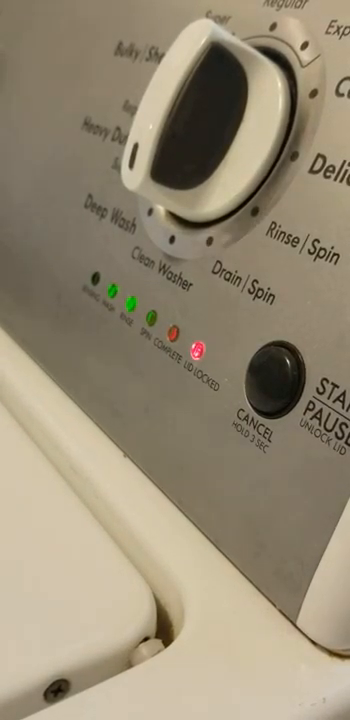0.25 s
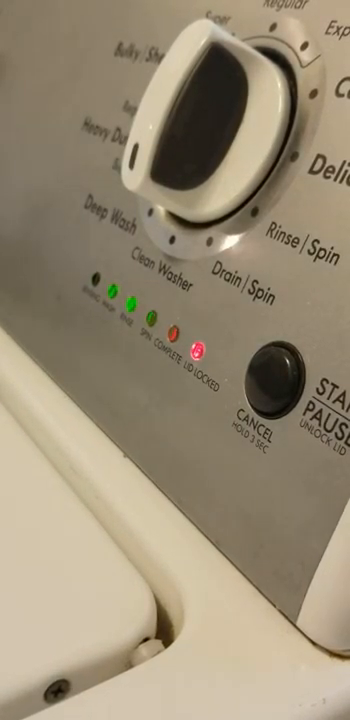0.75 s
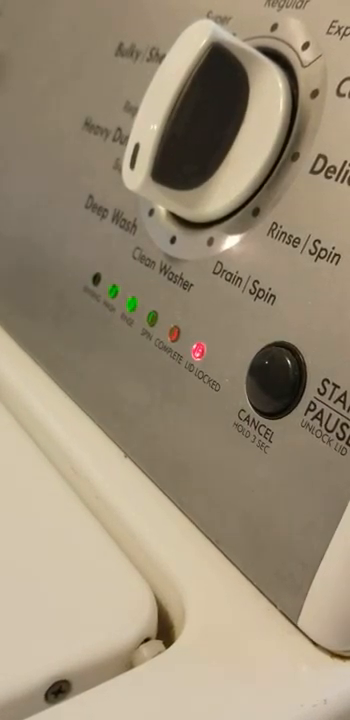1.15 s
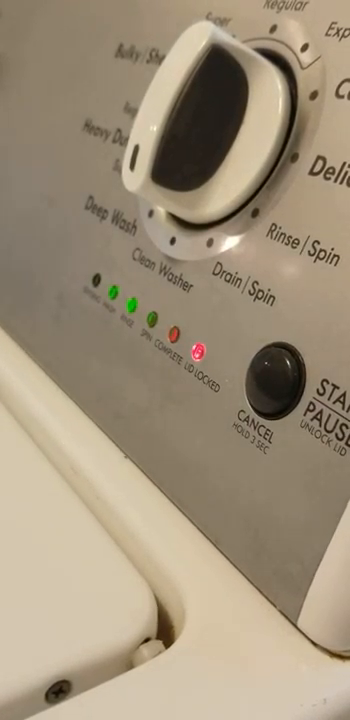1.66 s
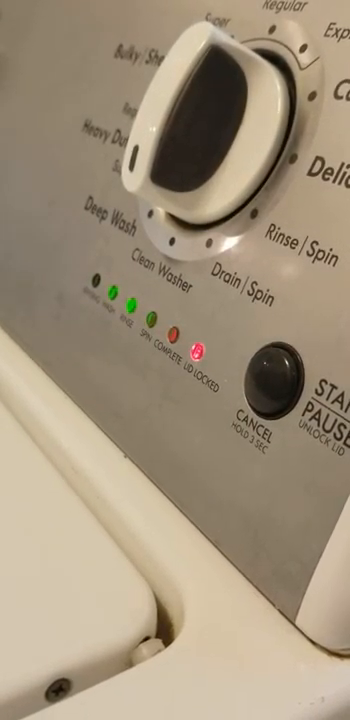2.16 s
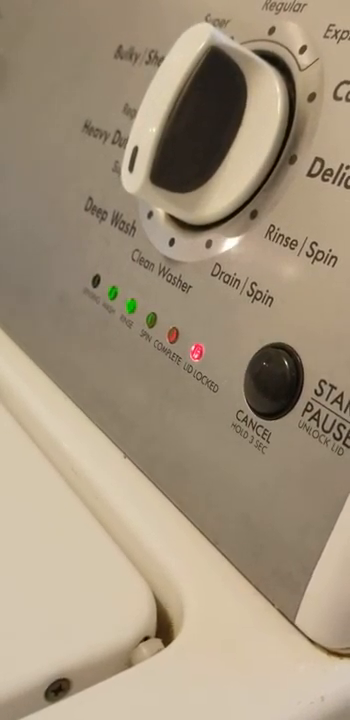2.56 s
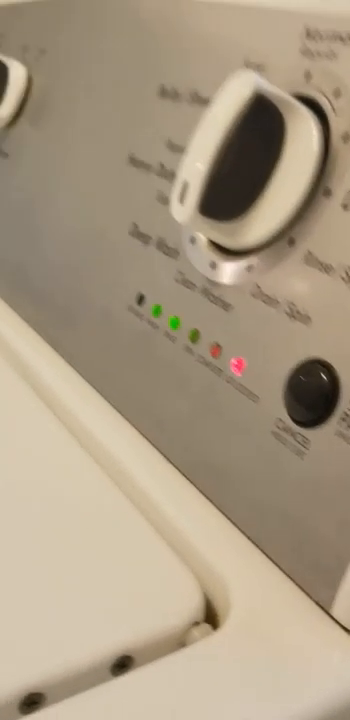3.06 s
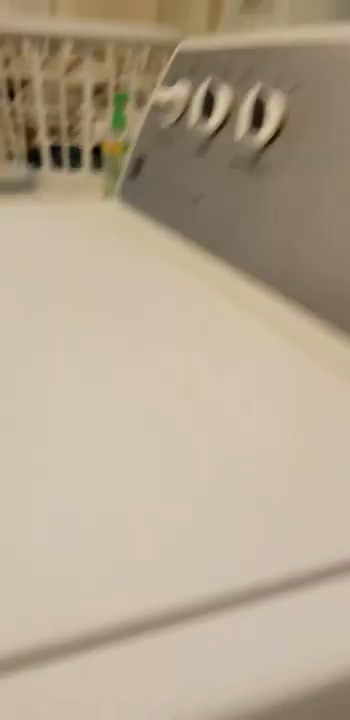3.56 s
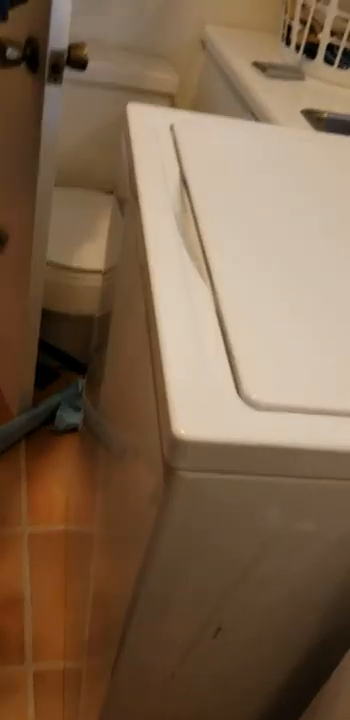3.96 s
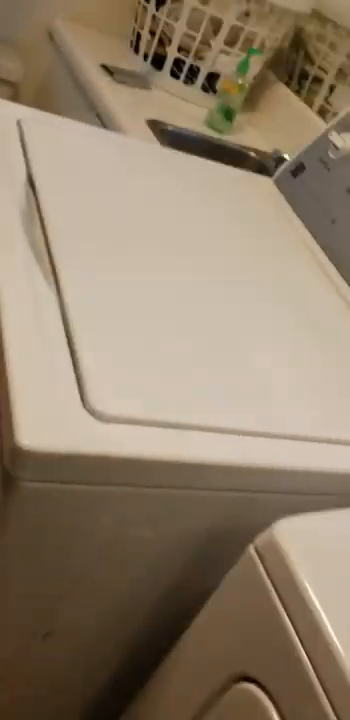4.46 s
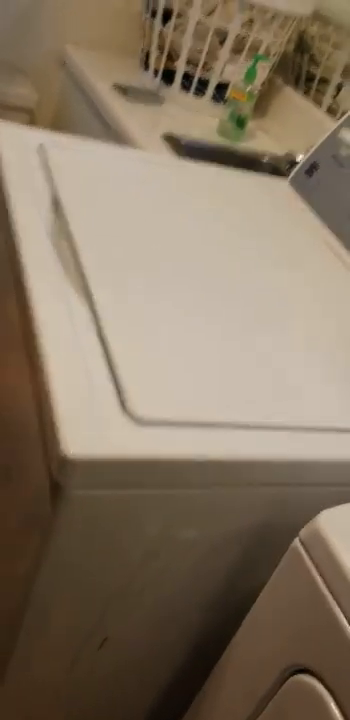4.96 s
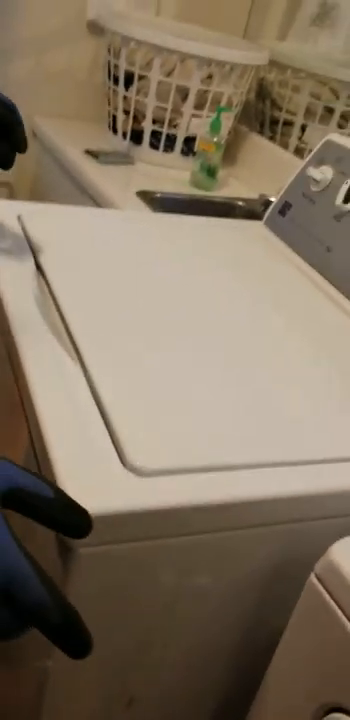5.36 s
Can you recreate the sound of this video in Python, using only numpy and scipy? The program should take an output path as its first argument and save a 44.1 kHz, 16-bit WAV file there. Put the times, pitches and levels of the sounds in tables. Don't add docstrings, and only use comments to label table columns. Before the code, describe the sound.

A top-loading washing machine fills behind its closed lid in a small laundry room. A bright jet of water hisses, sputters and splashes continuously, while falling water drums on the basket with a low, hollow, uneven boom. Wet slaps, plops and dull knocks scatter through it, a sharper one around 3.5 seconds. Close handheld stereo microphone, one side duller; the low boom weakens as it moves away.

```python
import sys
import numpy as np
from scipy import signal
from scipy.fft import rfft, irfft, next_fast_len
from scipy.io import wavfile

SR = 44100
rng = np.random.default_rng(int(sys.argv[2]) if len(sys.argv) > 2 else 0)


def invert_db(x):
    u = np.asarray(x, float) / 20
    return 10 ** u


def unload_wav(signal):
    wavfile.write(
        sys.argv[1],
        SR,
        np.round(np.clip(np.atleast_2d(signal).T, -1, 1) * 32767).astype(np.int16),
    )


N = 247842
STEP = 16

# time_s, jet_flow_db, nearness_db
FILL = [(0, -41, -16), (.25, -35, 4.5), (.45, -37.5, 2), (.7, -37, -2.5), (1.0, -36.5, 4.5),
        (1.5, -36, 4.5), (2.05, -36.5, -1.5), (2.55, -35, -7.5), (3.0, -35.5, -5), (3.5, -37, -8),
        (3.8, -35.5, -8), (4.0, -36, -7.5), (4.3, -37.5, -15), (4.7, -35.5, -8), (4.92, -37, 1),
        (5.2, -38.5, -8), (5.62, -39.5, -16)]
# time_s, level_db
SPRAY_BODY = [(0, 0), (.25, 0), (1, 0), (1.5, -0.1), (2.05, 1.5), (2.3, -1.5), (2.55, -1), (3, 0), (3.5, 1),
              (3.8, -1), (4, -1), (4.3, 2.5), (4.7, -0.5), (4.92, -0.5), (5.2, 1.4), (5.45, 1.5), (5.62, 5.5)]
# time_s, level_db
FALTERS = [(0.057, -3), (0.659, -7), (1.29, -27), (1.467, -15), (1.711, -4), (2.088, -10), (2.252, -11),
           (2.492, -1.5), (2.553, 0.5), (2.873, -1), (3.45, -9), (3.841, -16), (3.91, -3.5), (4.188, -25),
           (4.378, -3), (4.5, -1.5), (4.597, -9), (4.647, -5), (4.729, -13), (4.949, -1.5), (5.006, -7),
           (5.308, -2), (5.408, -3), (5.488, -10), (5.605, -14)]
# crest_s, level_over_lull_db
SURGES = [(0, 9), (.27, 9.5), (.59, 11), (.78, 5), (.86, 6), (1.03, 6.5), (1.22, 4.5), (1.33, 8),
          (1.47, 14.5), (1.57, 6.5), (1.64, 3.5), (1.785, 8), (1.94, 7.5), (2.1, 7), (2.21, 4.5), (2.36, 9),
          (2.5, 3.5), (2.68, 4), (2.74, 5), (2.85, 7), (2.95, 11.5), (3.1, 5), (3.38, 9), (3.58, 9),
          (3.72, 10), (3.79, 8.5), (3.86, 4.5), (4.14, 11), (4.3, 10), (4.41, 8), (4.55, 11), (4.74, 9),
          (4.9, -1), (5.43, 3.5), (5.6, 10.5)]
# time_s, level_db
THROBS = [(0.048, 10), (0.106, 12), (0.137, 11), (0.261, 4), (0.408, 6), (0.535, 7), (0.612, 9.5),
          (0.771, 3), (0.801, 11.5), (0.841, 8), (1.015, 6), (1.047, 10), (1.099, 9.5), (1.242, 6),
          (1.328, 6.5), (1.441, 7), (1.567, -1), (1.792, 9.5), (1.908, 9), (2.078, 4.5), (2.21, 6),
          (2.359, 0.5), (2.504, 7), (2.68, 7), (2.726, 3), (2.942, 5), (2.978, 2), (3.061, 7), (3.142, 10),
          (3.227, 6), (3.272, 5), (3.379, 3.5), (3.575, 3.5), (3.658, 6.5), (3.766, 4), (3.87, 9),
          (4.017, 7), (4.097, 10), (4.151, 3), (4.307, 2), (4.423, 0), (4.548, 8), (4.754, 2), (4.843, 9),
          (4.93, 10.5), (5.111, 2), (5.197, 4), (5.297, -7), (5.346, 3), (5.43, 8.5), (5.482, 8),
          (5.576, 9)]
# time_s, level_db
BREAKS = [(0.074, -13), (0.324, -5), (0.478, -8), (0.67, 0), (0.717, -2), (0.904, -18), (1.077, -9),
          (1.172, -25), (1.607, -16), (1.836, -6), (1.87, -9), (2.17, -11), (2.259, -15), (2.405, -18),
          (2.602, -11), (2.64, -10), (2.773, -18), (2.888, -6), (3.036, -9), (3.249, -11), (3.34, -11),
          (3.522, -14), (3.622, -10), (3.847, -10), (4.075, -9), (4.19, -14), (4.27, -11), (4.49, -15),
          (4.594, -14), (4.734, -13), (4.79, -17), (5.22, -24), (5.394, -18), (5.534, -17)]
# start_s, peak_db
THUMPS = [(0.002, -22), (2.735, -19), (3.798, -19), (4.012, -20.5), (5.468, -21.5), (0.826, -24),
          (0.884, -28), (0.939, -20), (1.008, -25), (1.086, -24), (1.205, -25), (1.474, -30), (1.778, -25),
          (2.608, -19.5), (2.713, -26), (2.975, -21.5), (3.136, -20.5), (3.259, -21), (3.406, -22),
          (3.5, -24), (3.671, -24.5), (3.744, -21), (3.859, -24), (4.607, -23), (4.739, -20.5),
          (4.823, -20.5), (5.417, -21.5), (.66, -26.5), (.752, -22.5), (.972, -31), (1.252, -31),
          (1.392, -28), (1.572, -26), (1.612, -36), (1.742, -25), (2.212, -24), (2.372, -22.5),
          (2.422, -21.5), (2.502, -29), (2.832, -22), (2.932, -28), (3.002, -21.5), (3.092, -27),
          (3.212, -25), (3.292, -24), (4.112, -25), (4.202, -25.5), (4.242, -20), (4.552, -21),
          (4.862, -24.5), (4.942, -21), (5.052, -24), (5.342, -27), (5.562, -28)]
# pitch_hz, width_hz, level_over_bed_db, left_right_likeness (0 to 1), right_minus_left_db
BASKET_MODES = [(139.1, 4.7, 3.5, 1, 0), (220.9, 16.1, 15.5, 0.98, 0), (266, 42, 9, 0.89, -1),
                (330.5, 18.8, 9.5, 1, -0.5), (436.6, 11, 1.5, 1, 4), (511, 30.4, 12.5, 0.13, -6),
                (532.7, 21, 5.5, 0.69, 10), (582.7, 22.7, 13, 0.98, -4), (617.5, 31.6, 11, 0.24, 13.5),
                (646, 36, 4, 0.48, 9.5), (725, 46, 7, 0.14, -3.5), (817, 32.4, 5.5, 0.27, 7),
                (1036, 73, 3.5, 0.076, 9.5), (1204, 18.6, 8.5, 0.12, 5.5)]
# pitch_hz, width_hz, left_gain_db, right_gain_db
PANEL_MODES = [
    (1841, 19, 7, 10.5),
    (2110, 88, 4.5, 10),
    (2657, 28, 6, 15),
    (2717, 37, 7, -4),
    (3780, 120, 4.5, 4),
    (4025, 53, 5, 12),
    (4840, 37, -5, -25),
    (5080, 76, 4, 9),
]
# start_s, peak_db, centre_hz, t60_s, spread_octaves
DEEP_SLAPS = [(.6679, -24, 2116, 0.28, 0.12), (0.96, -18.5, 2960, 0.17, 0.33),
              (1.153, -19.5, 2600, 0.16, 0.41), (1.41, -19.5, 2805, 0.2, 0.39),
              (1.6, -18, 2110, 0.18, 0.15), (2.38, -13, 3030, 0.22, 0.28), (2.7754, -20, 2670, 0.17, 0.77),
              (3.004, -17, 2720, 0.096, 0.18), (3.374, -9.5, 2585, 0.15, 0.14),
              (3.546, -13.5, 2490, 0.17, 0.52), (3.628, -17, 2710, 0.3, 0.29),
              (3.745, -18, 2850, 0.1, 0.37), (4.243, -19.5, 2730, .14, 0.14),
              (4.514, -22.5, 1990, 0.16, 0.97), (4.7632, -23.5, 2610, 0.18, .45),
              (5.108, -24, 4630, 0.11, 0.45), (5.169, -15.5, 1120, 0.06, 0.55),
              (5.4213, -22, 2110, 0.093, 0.97)]
# start_s, peak_db, centre_hz, t60_s
WALL_SLAPS = [(.2271, -22, 3920, 0.13), (.2588, -19, 4400, 0.11), (0.769, -20, 4200, 0.087),
              (.834, -23, 3360, 0.14), (1.194, -23.5, 4140, 0.25), (1.306, -13, 4080, 0.095),
              (1.5505, -21.5, 4320, 0.32), (1.602, -14.5, 4200, 0.084), (1.8093, -23.5, 3670, 0.35),
              (2.0237, -22, 3780, 0.13), (2.1909, -22, 4120, 0.15), (2.2092, -14.5, 4000, 0.12),
              (2.8868, -16, 4100, 0.24), (2.983, -18, 3780, 0.17), (3.0933, -19.5, 4060, 0.43),
              (3.2161, -18.5, 4120, 0.14), (3.5478, -17, 3700, 0.047), (3.747, -21.5, 3650, 0.3),
              (3.8636, -24, 4250, 0.11), (3.9985, -24, 3780, 0.24), (4.155, -21, 3280, 0.1),
              (4.2407, -20, 3690, 0.21), (4.4073, -18, 4090, 0.14), (4.6134, -20.5, 4160, 0.18),
              (5.0613, -22.5, 3890, 0.19), (5.161, -23, 4100, 0.097), (5.205, -19, 4250, 0.074),
              (5.5067, -24, 3740, 0.096), (5.5276, -15, 3980, 0.12), (5.555, -18.5, 3780, 0.13)]
# start_s, peak_db, centre_hz, t60_s
SPLASHES = [(.398, -25.5, 6660, 0.15), (.4409, -25.5, 6000, 0.27), (.9178, -26, 5560, .13),
            (0.938, -23, 5730, .36), (1.0056, -23.5, 6040, 0.1), (1.055, -20, 5170, 0.14),
            (1.178, -23, 5100, .1), (1.7704, -20, 5150, 0.081), (1.95, -24.5, 8450, 0.23),
            (2.509, -24.5, 5130, 0.085), (2.5681, -25.5, 5100, 0.18), (2.62, -24.5, 5520, 0.25),
            (2.7596, -26.5, 6300, 0.32), (3.153, -23, 6140, 0.15), (3.253, -17, 5100, 0.15),
            (3.3243, -22, 7200, 0.047), (3.474, -24, 8450, 0.076), (3.562, -13, 5600, 0.17),
            (3.923, -21, 6270, 0.17), (4.2004, -25, 6500, 0.07), (4.332, -22.5, 5240, 0.09),
            (4.3894, -25, 5340, 0.083), (4.7401, -24, 5100, 0.084), (4.837, -22.5, 5340, 0.18),
            (4.8606, -22.5, 8600, 0.11), (4.896, -25, 5200, 0.091), (4.943, -22.5, 8100, 0.11),
            (5.1467, -28, 6440, .1)]
# start_s, peak_db, centre_hz
BEADS = [(0.884, -25, 2620), (0.384, -22.5, 2380), (0.437, -21, 1480), (0.44, -21.5, 3040),
         (0.483, -25, 1900), (0.758, -20.5, 11700), (0.766, -25, 1890), (0.852, -23, 9800),
         (1.009, -27, 2380), (1.126, -20.5, 3780), (1.143, -18, 1530), (1.302, -19, 7560),
         (1.573, -21, 3000), (1.67, -22, 7560), (1.735, -25, 3780), (1.77, -22, 1500), (1.848, -29, 3000),
         (1.861, -21, 1890), (1.951, -20, 1810), (2.002, -22, 2380), (2.025, -27, 2380), (2.422, -16, 1530),
         (2.62, -18, 1500), (2.681, -23, 7560), (2.737, -23, 1500), (2.854, -27.0, 3780),
         (2.914, -23, 12000), (2.989, -19.5, 7560), (3.064, -25, 4760), (3.216, -24, 9520),
         (3.507, -24, 9700), (3.62, -20, 1500), (3.655, -22, 4760), (3.744, -19, 1500), (3.86, -28, 1890),
         (4.046, -18, 1500), (4.087, -24, 4760), (4.196, -20.5, 1500), (4.294, -18.5, 1510),
         (4.312, -22.5, 3780), (4.387, -19, 1890), (4.452, -21.5, 3040), (4.698, -30, 2380),
         (5.308, -26, 1890), (5.551, -22, 1900),
         (.04, -23, 2180), (.075, -25, 2600), (.553, -23, 4640), (.672, -35, 2150), (1.2535, -23, 4020),
             (2.381, -20, 3780), (2.41, -20, 3270), (3.106, -23, 4020), (3.254, -28, 3600),
             (3.567, -8.5, 1020), (4.521, -19, 5330), (4.895, -35, 3600), (5.092, -23, 3600),
             (5.321, -25, 4570), (5.421, -26, 4420), (5.453, -36, 5000), (5.565, -25, 4600)]
# start_s, peak_db, t60_s
SPITS = [(.0932, -23, .11), (.1486, -25, .09), (0.198, -17.5, 0.12), (.3656, -20.5, 0.13),
         (0.486, -15.5, 0.042), (.5217, -21, 0.2), (.9173, -19.5, 0.2), (1.0465, -20, 0.068),
         (1.2535, -16.5, 0.12), (1.371, -20.5, 0.23), (1.4356, -19.5, .082), (1.4805, -20, 0.11),
         (1.5983, -15.5, 0.081), (1.7255, -20, 0.084), (2.0218, -16.5, 0.089), (2.2076, -15.5, 0.12),
         (2.3, -20.5, 0.22), (2.7197, -24, 0.18), (2.822, -9.5, 0.037), (2.856, -14, 0.029),
         (3.0969, -17, 0.053), (3.5638, -13, 0.047), (3.797, -18.5, 0.062), (3.8617, -13.5, 0.053),
         (3.9978, -23, 0.11), (4.334, -19, 0.081), (4.3914, -18.5, 0.08), (4.571, -18, .062),
         (4.8973, -19.5, 0.16), (5.5069, -17, 0.051)]
# start_s, peak_db
FLECKS = [(.002, -21), (.0682, -23), (.55, -21), (.62, -21), (.7941, -21), (1.0869, -21), (1.1902, -20),
          (1.2989, -22), (1.8277, -22), (1.98, -41), (2.3725, -37), (2.8858, -15.5), (2.9597, -23),
          (3.0325, -29), (3.1532, -21), (3.2525, -25), (3.361, -19), (3.6232, -22), (3.705, -21),
          (3.7424, -22), (3.929, -22), (4.0756, -21), (4.138, -18.5), (4.1994, -22), (4.533, -18.5),
          (4.6758, -25), (4.8648, -19), (4.9222, -20), (5.108, -19.5), (.4394, -23), (3.136, -33),
          (3.4745, -20.5), (4.045, -19), (4.268, -22), (4.457, -19), (4.5096, -30), (5.165, -32),
          (5.235, -28), (5.264, -29), (5.322, -24), (5.349, -23), (5.421, -26), (5.453, -24), (5.498, -34),
          (5.528, -22), (5.556, -19), (5.615, -20.5)]
# frequency_hz, density_db_per_hz
OPEN_PORT_COLOUR = [(30, -27), (50, -13), (90, 1), (175, -4.5), (390, -6.5), (850, -8.5), (1100, -18),
                    (1450, -12.5), (1900, -5.5), (3300, -3.5), (5000, -3.5), (6500, -8), (9500, -4.5),
                    (15500, 1.2)]
# frequency_hz, gain_db
PORT_SHADE = [(100, -5), (400, -3), (585, -15), (800, -8), (1300, -9), (2700, -9.5), (3300, -14.5),
              (4400, -7.5), (5000, -12.5), (6500, 2), (7800, -4.5), (9000, -2), (11500, -7.5), (13500, -25)]

LULL_DB, SWELL_S, EBB_S, DRUM_NEAR = -40, 0.05, 0.044, 0.39
FALTER_S, RECOVER_S, FALTER_DRUM, DEEPEST_FALTER_DB = 0.0068, 0.0089, 0.7, -3.5
THROB_S, BREAK_S, THROB_MODES = 0.012, 0.009, 0.53
RING_DB, RING_NEAR, RING_SURGE, RING_FLICKER_DB = -49, 1.54, 0.32, -1
BED_FLICKER_DB, HISS_OVER_DB, HISS_FLICKER_DB = 0.8, 0.36, 0.9
BOOM_HZ, BOOM_DB, BOOM_WANDER_HZ = 253.4, -1, 3.996
KNOCK_HZ, KNOCK_WIDTH_HZ, KNOCK_DB, KNOCK_RIGHT_DB = 639, 131, -1.5, 1
DROPS_PER_S, DROP_DB, DROP_SPREAD_DB = 100, -36.5, 3.5
LARGEST_SPLAT = 1.6
PLOP_TONE, PLOP_RISE, PLOP_WIDTH = 1, 0.25, 0.06
CRACK_DB, CRACK_T60_S = 1.5, 0.017
BEAD_T60_S, BEAD_OCTAVES = 0.12, 0.2
SPIT_HZ, SPIT_OCTAVES, FLECK_T60_S = 11900, 0.69, 0.061
PORT_LAG = 7
CUTOFF_HZ = 15800


def rms_one(x):
    return x / np.sqrt(np.mean(x ** 2) + 1e-20)


def slow_to_full(v):
    return np.interp(np.arange(N) / STEP, np.arange(len(v)), v)


def drift(rate_hz):
    r = np.exp(-2 * np.pi * rate_hz * STEP / SR)
    noise = rng.standard_normal(N // STEP + 3001)
    return rms_one(signal.lfilter([1], [1, -2 * r, r * r], noise)[3000:])


def resonance(x, hz, width_hz):
    r = np.exp(-np.pi * width_hz / SR)
    peak = np.array([1, 0, -1]) * (1 - r * r) / 2
    return signal.lfilter(peak, [1, -2 * r * np.cos(2 * np.pi * hz / SR), r * r], x)


def bursts(rows, rise_s):
    start, peak_db, t60 = np.transpose(rows)[:, :, None]
    age = np.maximum(np.arange(N // STEP + 1) * STEP / SR - start, 0)
    return (1 - np.exp(-age / rise_s)) * invert_db(2 * (peak_db - 60 * age / t60))


def crests(t, rows, before_s, after_s, order=1):
    s, db = np.transpose(rows)[:, :, None]
    distance = np.abs(t - s) / np.where(t < s, before_s, after_s)
    return (db * np.exp(-distance ** order)).sum(axis=0)


def droplets(per_s, size_db, t60):
    born = rng.random(N // STEP + 1) < per_s * STEP / SR
    sizes = invert_db(2 * size_db * np.minimum(rng.exponential(1, len(born)), LARGEST_SPLAT))
    env = signal.lfilter([1], [1, -invert_db(-120 * STEP / SR / t60)], born * sizes)
    return env / env.mean()


def port_noise(alike):
    left, own = rng.standard_normal((2, 2, N))
    right = alike * np.roll(left, PORT_LAG, axis=1) + np.sqrt(1 - alike ** 2) * own
    return np.stack([left, right], axis=1)


def slugs():
    deep = [(s, db, hz, spread, t60, -6) for s, db, hz, t60, spread in DEEP_SLAPS]
    wall = [(s, db, hz, 0.28, -9.5) for s, db, hz, t60 in WALL_SLAPS]
    wall = [row[:4] + (t60,) + row[4:] for row, (_, _, _, t60) in zip(wall, WALL_SLAPS)]
    thin = [(s, db, hz, 0.33, t60, -2) for s, db, hz, t60 in SPLASHES]
    return deep + wall + thin


def boom(drum_db):
    hz = slow_to_full(BOOM_HZ + BOOM_WANDER_HZ * drift(7.2))
    level = slow_to_full(invert_db(drum_db + BOOM_DB + 0.98 * drift(6.3)))
    return level * np.sin(2 * np.pi * np.cumsum(hz) / SR)


def drumming(drum_db, ring_db, throb_db):
    thumps = bursts([(s, db, 0.08) for s, db in THUMPS], 0.00047).sum(axis=0) * invert_db(66.5)
    patter = slow_to_full(np.sqrt(0.66 + 0.2 * droplets(110, 6.3, 0.029)))
    mid, side, loose = rng.standard_normal((3, N)) * patter
    apart = side * [[1], [-1]]
    throb = slow_to_full(invert_db(THROB_MODES * throb_db))
    high = signal.butter(2, 400, "high", fs=SR, output="sos")
    low = signal.butter(2, 900, fs=SR, output="sos")
    bed = signal.sosfilt(low, loose + signal.sosfilt(high, apart))
    out = bed * slow_to_full(invert_db(0.41 * (drum_db + 35.5)))
    for k, (hz, width, db, alike, right_db) in enumerate(BASKET_MODES):
        alike = np.clip(alike, 0, 1)
        upper = hz > 400
        if 480 < hz < 550:
            level_db = ring_db + 50.5
        else:
            level_db = (0.3 if upper else 0.7) * (drum_db + 41.5)
        drive = invert_db(level_db) * np.sqrt(0.83 + 0.39 * droplets(40, 2.6, 0.018) + upper * thumps)
        pair = np.sqrt(1 + alike) * mid + np.sqrt(1 - alike) * apart
        mode = invert_db([[db], [db + right_db]]) * resonance(slow_to_full(drive) * pair, hz, width)
        if 200 < hz < 300:
            mode = mode * throb
        out = out + mode * (-1) ** k
    return invert_db(-26) * out


def knocks():
    size_steps = np.minimum(rng.exponential(1, N), LARGEST_SPLAT)
    sizes = invert_db(DROP_DB + DROP_SPREAD_DB * size_steps) * rng.choice([-1, 1], N)
    clicks = sizes * (rng.random(N) < DROPS_PER_S / SR) + 1e-18
    s, db = np.transpose(THUMPS)
    clicks[(s * SR).astype(int)] = invert_db(db)
    ring = resonance(clicks, KNOCK_HZ, KNOCK_WIDTH_HZ)
    ring = resonance(ring, 0.82 * KNOCK_HZ, 1.84 * KNOCK_WIDTH_HZ)
    port_gain = invert_db([[KNOCK_DB + 5.5], [KNOCK_DB + 7 + KNOCK_RIGHT_DB]])
    return ring * SR / (np.pi * KNOCK_WIDTH_HZ) * port_gain


def plops():
    rows, length = slugs(), 8192
    out, age = np.zeros((2, N + length)), np.arange(length) / SR
    for (s, db, hz, _, t60, plop_db), noise in zip(rows, rng.standard_normal((len(rows), 2, length))):
        width = PLOP_WIDTH * hz
        narrow = rms_one(resonance(resonance(noise, hz, width), hz, width))
        rise = PLOP_RISE * (hz > 3200) * age / t60
        pocket = 0.66 * narrow + PLOP_TONE * np.sin(2 * np.pi * hz * age * (1 + rise))
        envelope = (1 - np.exp(-age / 0.00068)) * invert_db(db + plop_db - 48 * age / t60)
        at = round(s * SR)
        out[:, at:at + length] += pocket * envelope
    return out[:, :N]


def spray(bed_db, hiss_db):
    beads = [(s, db, hz, BEAD_OCTAVES, BEAD_T60_S, 0) for s, db, hz in BEADS]
    slaps = np.array(slugs() + beads)
    spits = SPITS + [(s, db, FLECK_T60_S) for s, db in FLECKS]
    centre = np.r_[slaps[:, 2], np.full(len(spits), SPIT_HZ)]
    spread = np.r_[np.maximum(slaps[:, 3], 0.15), np.full(len(spits), SPIT_OCTAVES)]
    cracks = bursts([(s, db + CRACK_DB, CRACK_T60_S) for s, db in slaps[:, :2]], 0.00062)
    slap_power = (bursts(slaps[:, [0, 1, 4]], 0.001) + cracks) * invert_db(-11)
    power = np.r_[slap_power, bursts(spits, 0.001) * invert_db(-17)]
    shared = droplets(80, 5.1, 0.0073)
    white, out = port_noise(0.28), 0
    edges = 900 * 2 ** np.arange(0, 4.4, 1 / 4)
    for k, (low, high) in enumerate(zip(edges, edges[1:])):
        hz = np.sqrt(low * high)
        near = np.exp(-0.5 * (np.log2(hz / centre) / spread) ** 2) + 0.014
        fine = np.clip(np.log2(hz / 7500), 0, 1)
        bed = invert_db(2 * ((1 - fine) * (bed_db - 1.37) + fine * hiss_db + 0.16 * drift(24)))
        bed = bed * (0.78 + 0.098 * shared + 0.41 * droplets(55, 31, 0.079))
        band_pass = signal.butter(3, [low, high], "band", fs=SR, output="sos")
        out = out + slow_to_full(np.sqrt(bed + near @ power)) * signal.sosfilt(band_pass, white[k % 2])
    panels = 0
    for hz, width, left_db, right_db in PANEL_MODES:
        panels = panels + (invert_db([[left_db], [right_db]]) - 1) * resonance(out, hz, width)
    return out + panels


def scene():
    t = np.arange(N // STEP + 1) * STEP / SR
    s, flow, nearness = np.transpose(FILL)
    near_db = np.interp(t, s, nearness)
    surge_db = crests(t, SURGES, SWELL_S, EBB_S)
    falter_db = crests(t, FALTERS, FALTER_S, RECOVER_S)
    flow_db = np.interp(t, s, flow) + np.maximum(falter_db, DEEPEST_FALTER_DB)
    drum_db = LULL_DB + surge_db + DRUM_NEAR * near_db + FALTER_DRUM * falter_db
    throb_db = crests(t, THROBS, THROB_S, THROB_S, order=2) + crests(t, BREAKS, BREAK_S, BREAK_S, order=2)
    ring_db = RING_DB + RING_SURGE * surge_db + RING_NEAR * near_db + RING_FLICKER_DB * drift(4.4)
    bed_db = flow_db + np.interp(t, *np.transpose(SPRAY_BODY)) + BED_FLICKER_DB * drift(5.5)
    hiss_db = flow_db + HISS_OVER_DB + HISS_FLICKER_DB * drift(0.71)
    basket = invert_db(7) * boom(drum_db + throb_db) + drumming(drum_db, ring_db, throb_db) + knocks()
    return basket + invert_db(-5) * plops() + invert_db(13) * spray(bed_db, hiss_db)


def band_limit(x):
    return signal.sosfilt(signal.butter(12, 16800, fs=SR, output="sos"), x)


def record(dry):
    size = next_fast_len(N + 4096)
    log_hz = np.log(np.arange(size // 2 + 1) * SR / size + 1)
    curves = [np.transpose(rows) for rows in (OPEN_PORT_COLOUR, PORT_SHADE)]
    left_db, shade_db = [np.interp(log_hz, np.log(hz), db) for hz, db in curves]
    colour = invert_db(np.array([left_db, left_db + shade_db]))
    heard = irfft(rfft(dry, size) * colour, size)[:, :N]
    top_cut = signal.ellip(12, 0.3, 70, CUTOFF_HZ - 60, fs=SR, output="sos")
    mix = signal.sosfilt(top_cut, heard)
    return band_limit(mix)


dry = scene()
out = record(dry)
unload_wav(out)
```